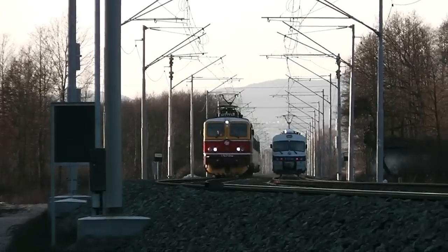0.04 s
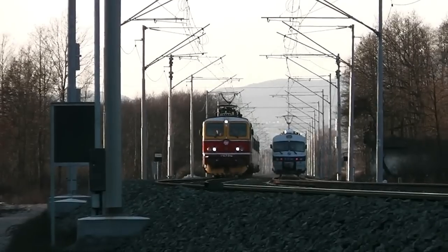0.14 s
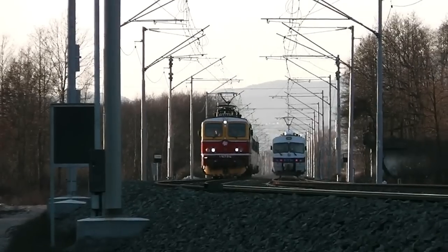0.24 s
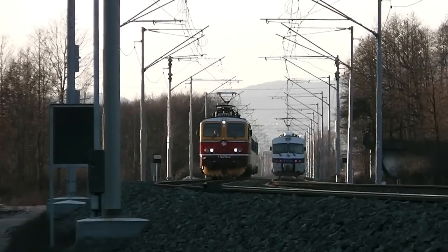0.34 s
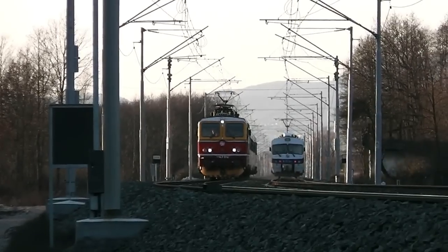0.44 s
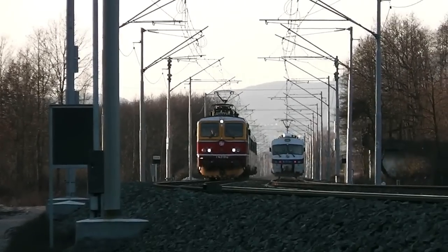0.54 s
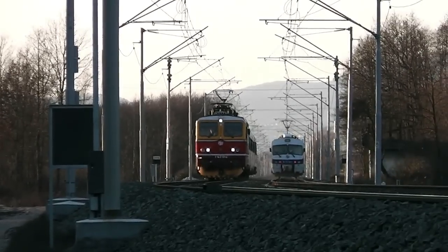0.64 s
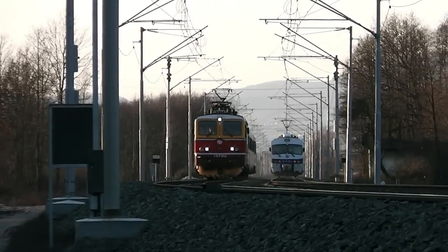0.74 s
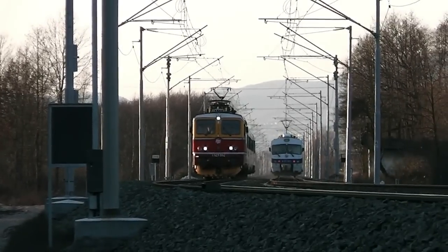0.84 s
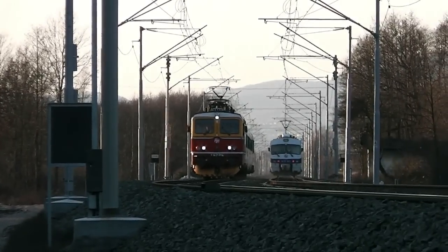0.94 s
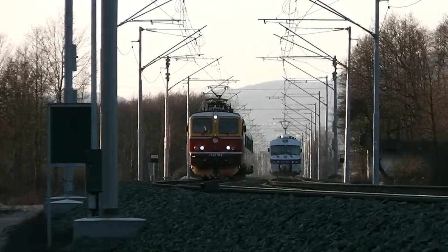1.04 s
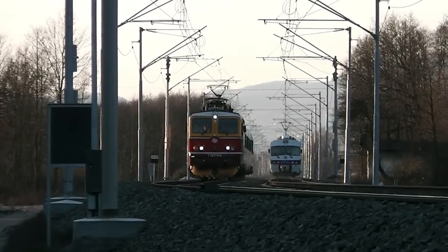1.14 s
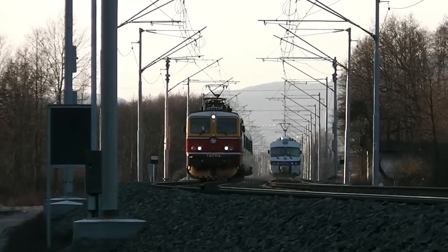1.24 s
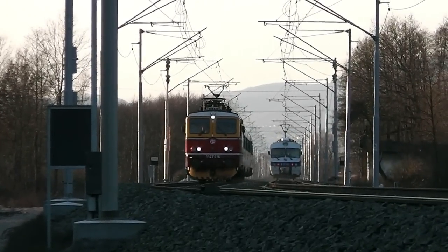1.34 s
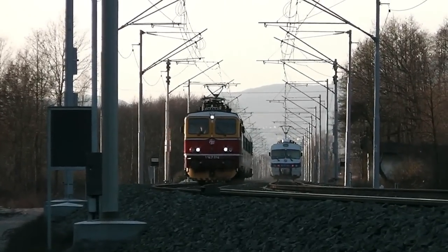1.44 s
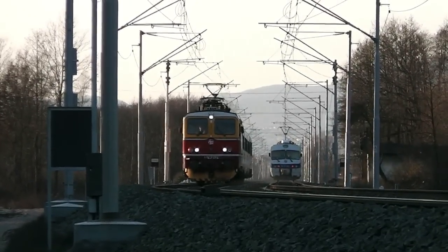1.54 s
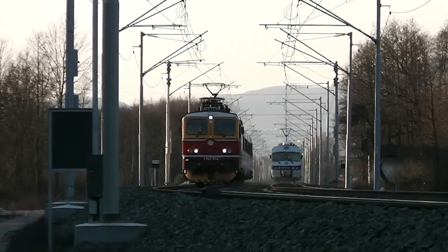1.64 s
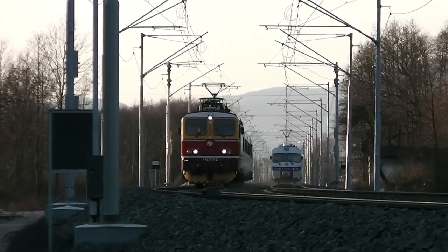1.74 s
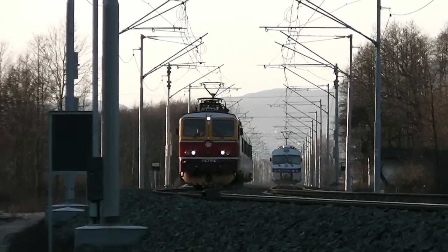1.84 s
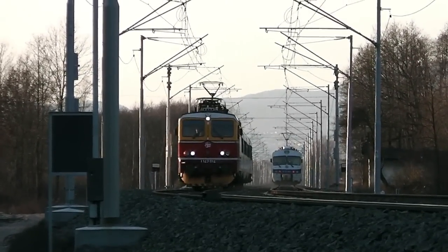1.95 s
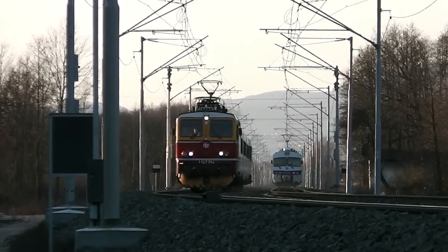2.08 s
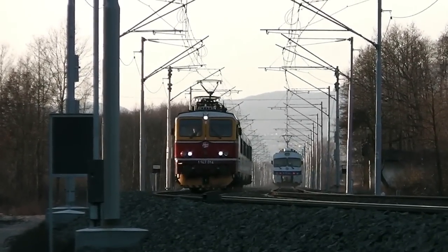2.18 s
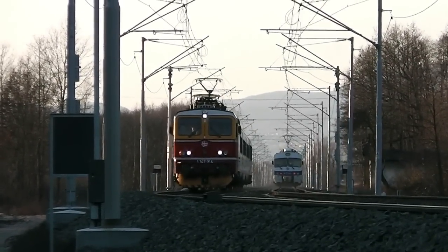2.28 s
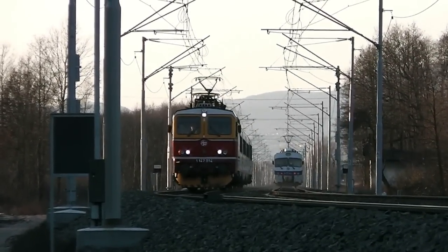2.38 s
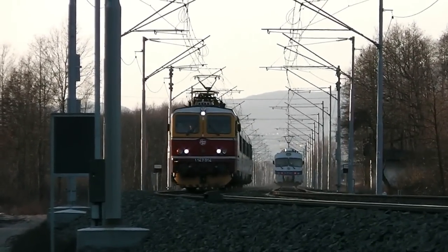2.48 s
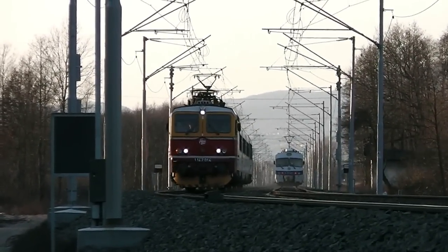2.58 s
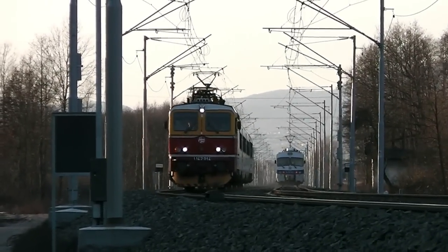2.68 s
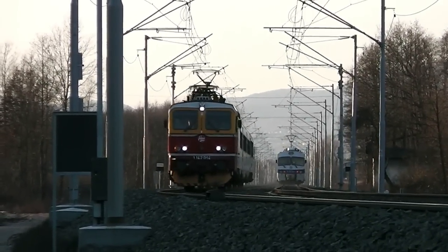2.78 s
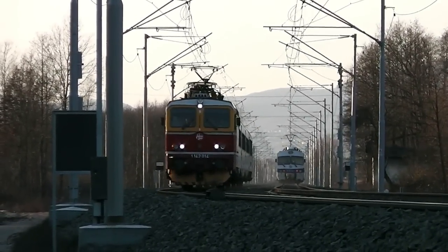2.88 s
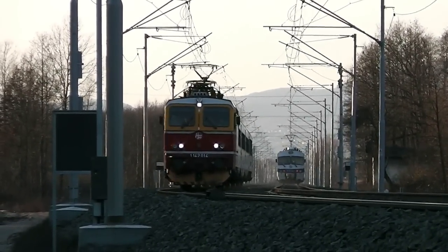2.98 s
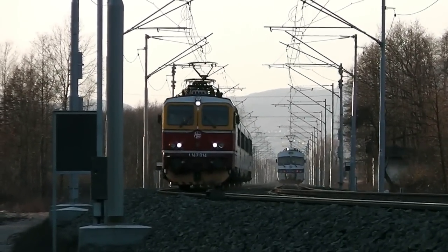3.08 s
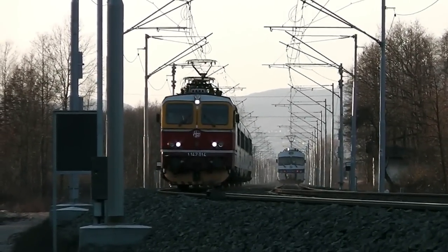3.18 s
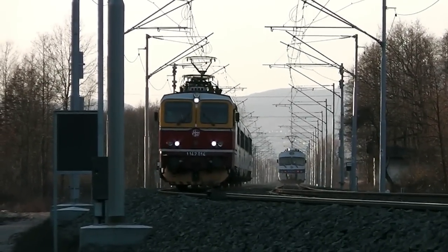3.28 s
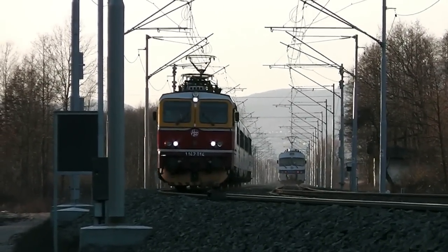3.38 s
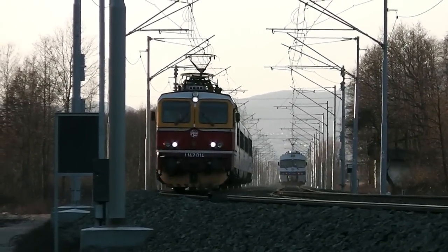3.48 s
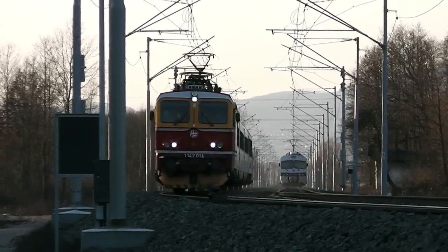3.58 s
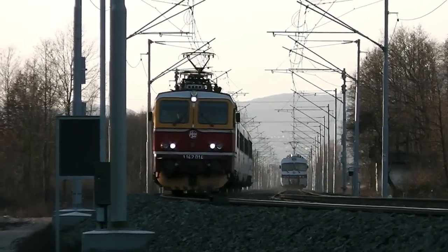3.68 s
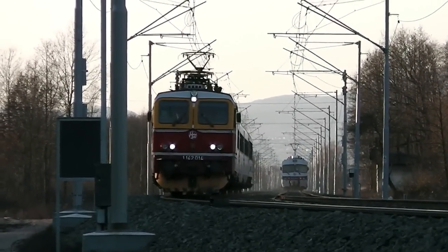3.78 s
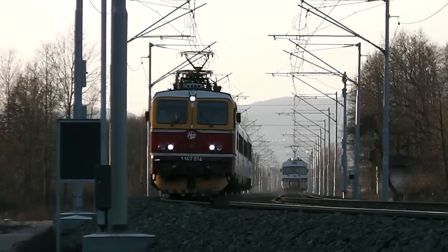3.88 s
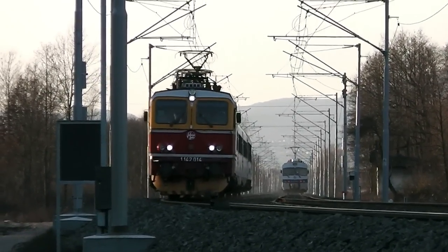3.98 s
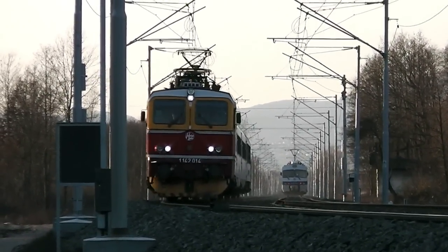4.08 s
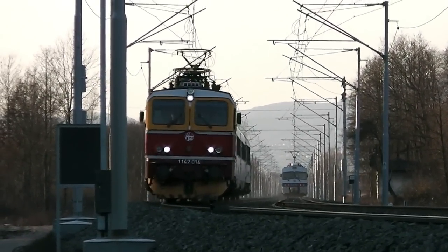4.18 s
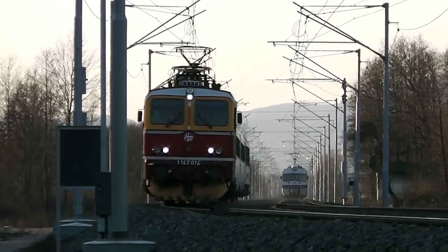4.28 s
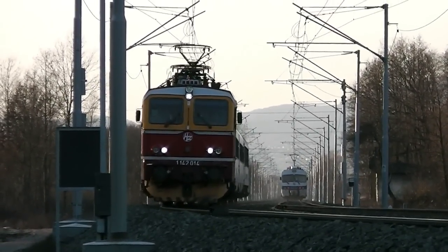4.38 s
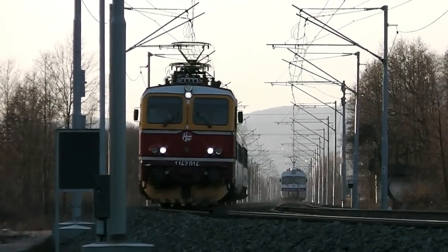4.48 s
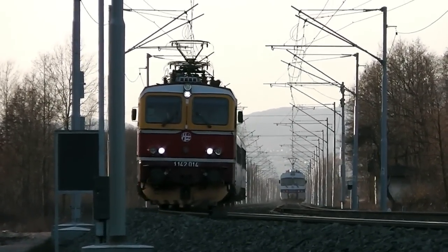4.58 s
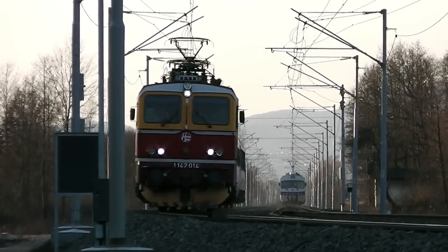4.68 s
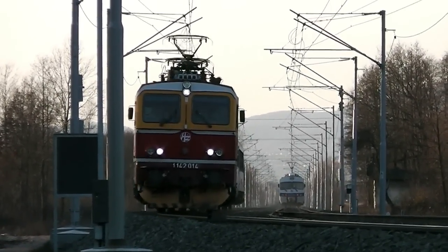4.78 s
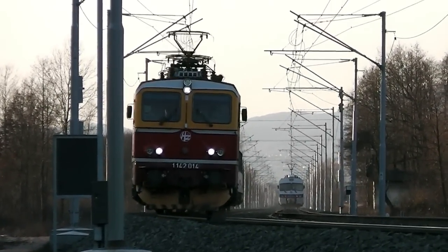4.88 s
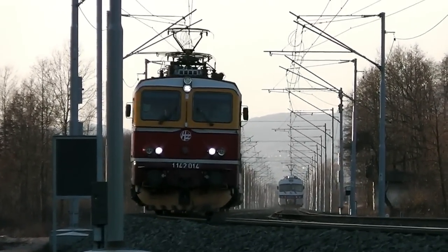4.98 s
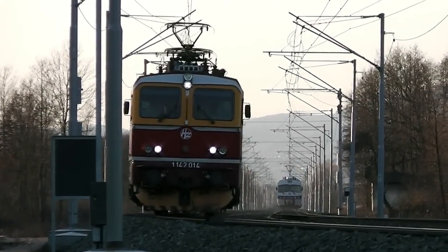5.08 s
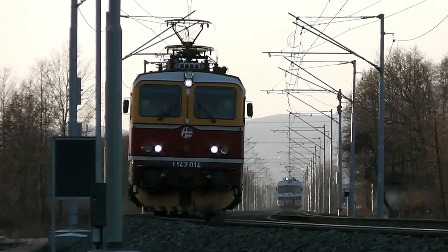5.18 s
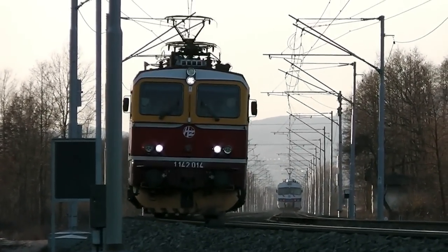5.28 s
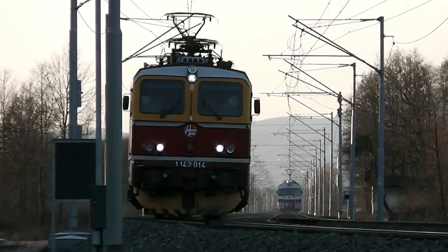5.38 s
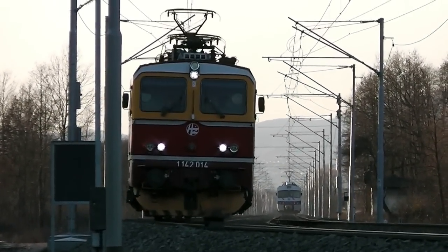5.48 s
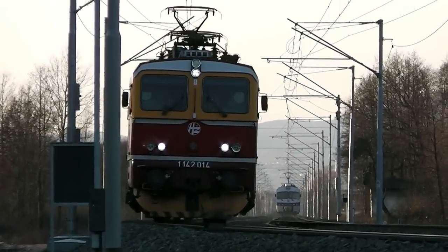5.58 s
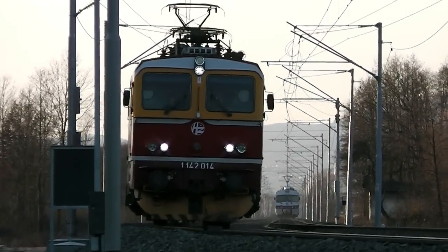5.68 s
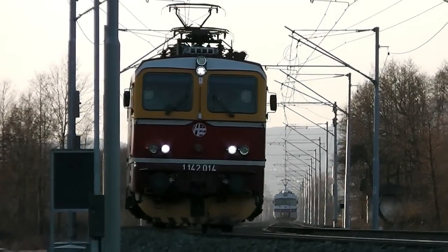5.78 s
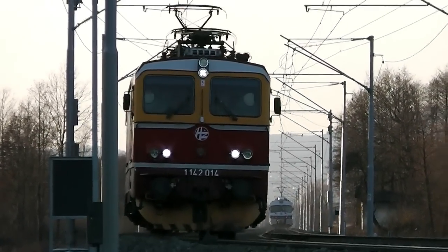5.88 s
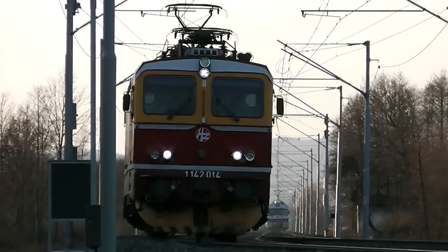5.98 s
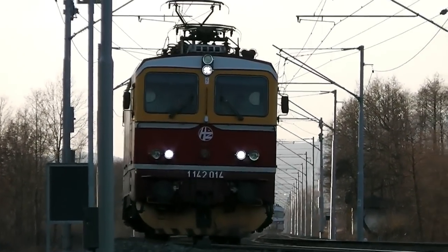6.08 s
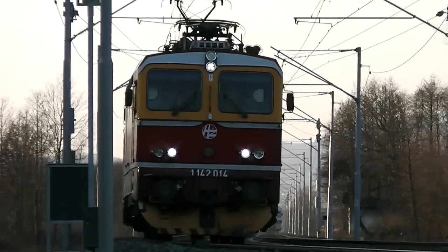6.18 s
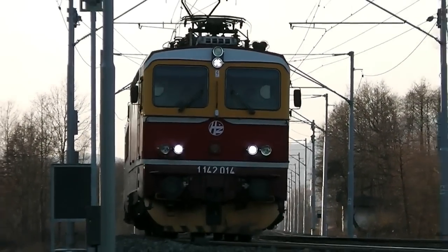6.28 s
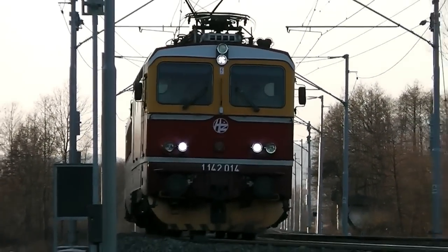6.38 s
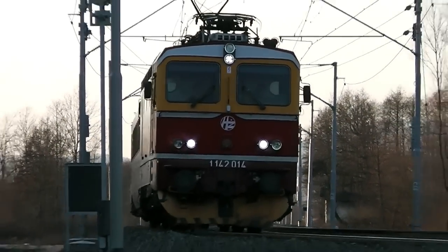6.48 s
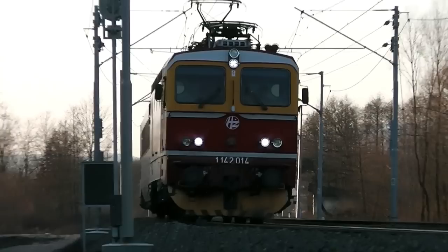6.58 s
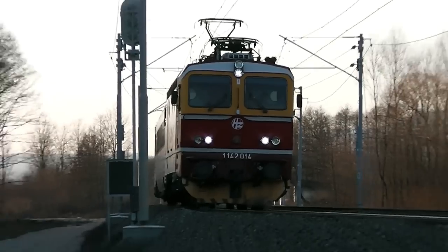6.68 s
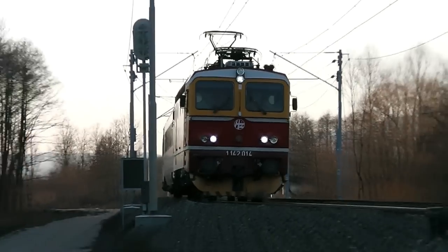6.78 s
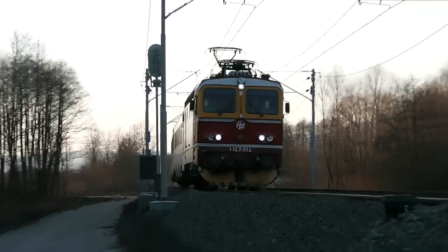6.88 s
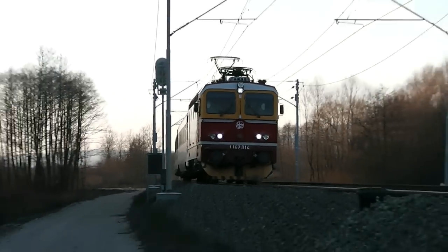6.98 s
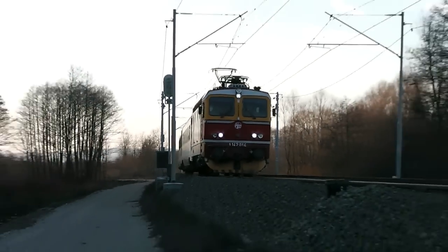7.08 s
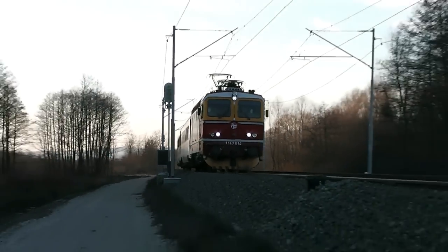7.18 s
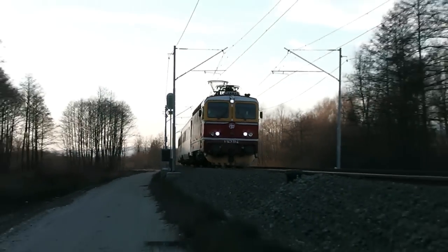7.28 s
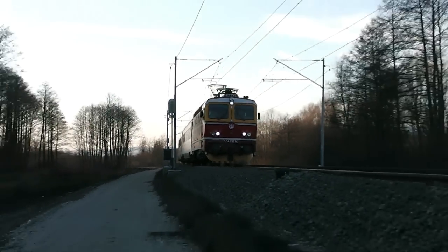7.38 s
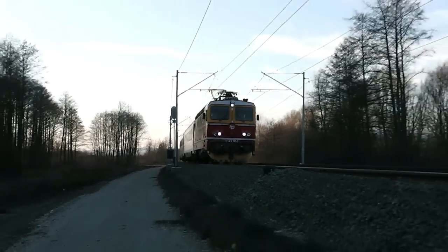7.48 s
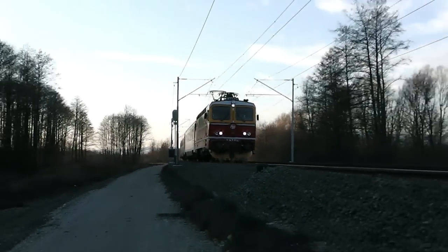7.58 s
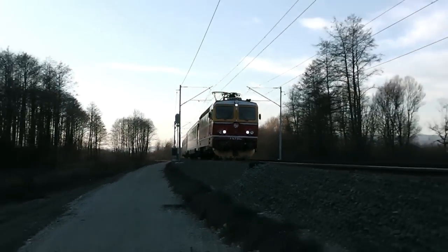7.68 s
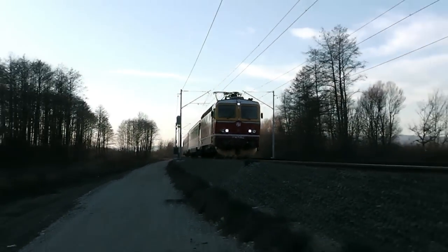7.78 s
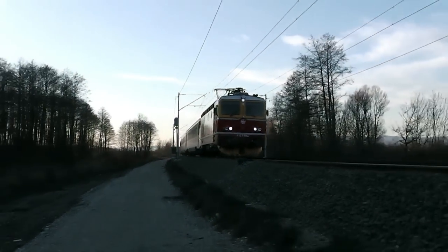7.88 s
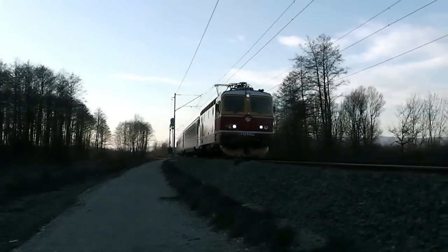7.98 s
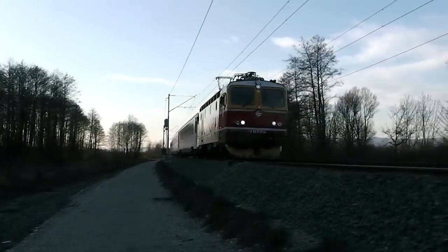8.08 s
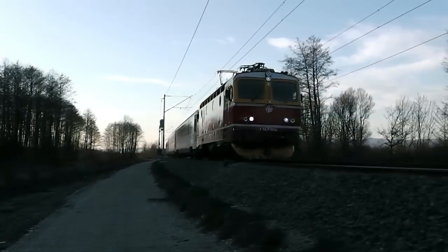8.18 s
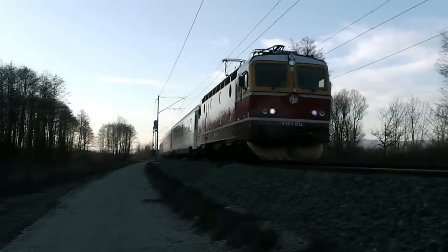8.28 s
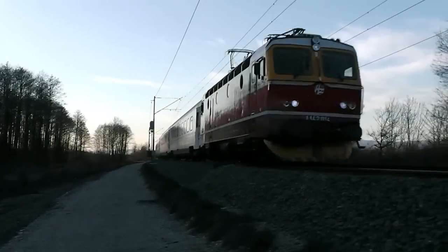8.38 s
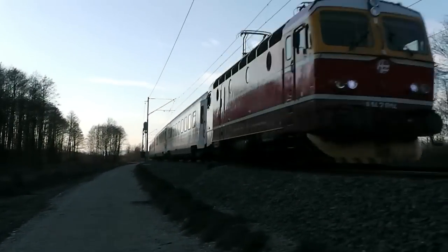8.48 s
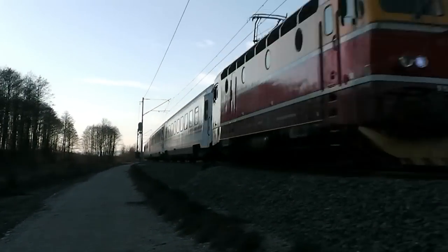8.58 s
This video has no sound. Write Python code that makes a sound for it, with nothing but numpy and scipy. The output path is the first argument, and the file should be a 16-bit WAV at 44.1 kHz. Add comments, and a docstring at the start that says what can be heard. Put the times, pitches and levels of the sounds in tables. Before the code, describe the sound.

An open-air trackside scene, heard in stereo from a few metres away. From 0 to 2 seconds it is quiet: low outdoor rumble, a hollow mid-pitched drone from a far train, and a barely audible hiss with tiny rapid ticks. Around 2 to 3 seconds thin, wavering high tones begin to sing in the rails. Rolling noise climbs steadily, a grainy metallic roar with ringing wheels clustered in the middle range, swelling a little near 4 seconds. From 5 to 7 seconds it grows fuller and a brighter hiss opens up; at about 7 a blower's hum swells briefly. From 7.5 the roar rises steeply, with deep ground rumble and body boom. After 7.9 short, quick surges pulse through it, strongest near 8.45. The ringing pitch sinks slightly. It ends near 8.6, at full force, with the locomotive almost alongside and no fading away.

```python
"""A low drone and rumble give way to a growing roar as an electric locomotive with coaches comes close.
Thin high tones run ahead inside the rails; a hiss opens up, and the locomotive's blower comes through last.
Wheel and rail roughness drives the ground, the sleepers, the rails and the ringing wheels.
Each of these is random noise shaped in frequency, then in level; the train is almost level at the end."""
import sys
import numpy as np
from scipy.fft import rfft, irfft, next_fast_len
from scipy.io import wavfile
from scipy.ndimage import uniform_filter1d, minimum_filter1d

SR = 44100
rng = np.random.default_rng(int(sys.argv[2]) if len(sys.argv) > 2 else 0)


def generate_wav(sig):
    """Save sig (samples, or channels by samples) to the path in sys.argv[1] as 16-bit PCM at SR."""
    pcm = np.round(np.clip(np.atleast_2d(sig).T, -1, 1) * 32767).astype(np.int16)
    wavfile.write(sys.argv[1], SR, pcm)


N = 381465
TIME = np.arange(N) / SR  # s
SIZE = next_fast_len(N + 4096, real=True)  # samples in each Fourier transform
HZ = np.maximum(np.arange(SIZE // 2 + 1) * SR / SIZE, 1)  # kept above 0 for the logarithm

ARRIVAL_S = 9.044  # when the locomotive would be level with the listener, after the end
SPEED_M_PER_S = 25
TRACK_M = 6.7  # from the listener to the track


def from_db(db):
    """Turns decibels into gain."""
    return 10 ** (np.asarray(db) / 20)


def in_time(rows):
    """Reads the columns of a time table at every sample."""
    s, *columns = np.transpose(rows)
    return [np.interp(TIME, s, column) for column in columns]


def over_hz(rows):
    """Reads the columns of a frequency table at every bin, along a logarithmic frequency axis."""
    hz, *columns = np.transpose(rows)
    return [np.interp(np.log(HZ), np.log(hz), column) for column in columns]


def colour(spectrum):
    """Gain per bin of a spectrum that falls away steeply above its last point."""
    last_hz = spectrum[-1][0]
    steep_fall = np.minimum(last_hz / HZ, 1) ** 4
    return from_db(over_hz(spectrum)[0]) * steep_fall


def resonances(modes):
    """Gain per bin of steep-sided resonances, added in power, with less treble far above the last."""
    power = 0
    for hz, width, db in modes:
        power = power + from_db(db) ** 2 / (1 + ((HZ - hz) / width) ** 2 * 2) ** 2
    last_hz = modes[-1][0]
    return np.sqrt(power) / (1 + (HZ / last_hz / 2) ** 4)


def excite(gain, low_hz=0, high_hz=SR):
    """Spectra of a direct and a scattered random drive through a response; rms 1 between the edges."""
    power = np.sum(gain[(HZ > low_hz) & (HZ < high_hz)] ** 2)
    white = rng.standard_normal((2, len(HZ), 2)).view(complex)[..., 0]
    return white * gain * SIZE / np.sqrt(power) / 2


def wave(spectra):
    """Turns spectra back into sound."""
    return irfft(spectra, SIZE)[..., :N]


def drift(rate):
    """A slow random wander: random points of spread 1, rate of them a second, joined by lines."""
    knots = rng.standard_normal(200)
    return np.interp(TIME * rate, np.arange(len(knots)), knots)


def swell_db(at_s, half_s, height_db):
    """A smooth rise and fall in level."""
    return height_db * np.exp(-((TIME - at_s) / half_s) ** 2)


def ahead_m():
    """Track still to cover before the locomotive is level with the listener."""
    return SPEED_M_PER_S * (ARRIVAL_S - TIME)


def closeness():
    """Inverse distance of the locomotive, 1 when it is level with the listener."""
    return TRACK_M / np.hypot(ahead_m(), TRACK_M)


def carried_db(level_db, loss_db_per_m, near_db, rough_share):
    """Rolling noise follows the roughness, loses the same dB on every metre and shifts close by."""
    # roughness of the stretch of rail under the train: t/s, level/dB
    roughness = [(0, .3), (1.4, -.3), (2.3, .2), (2.85, 1.0), (3.55, 0), (3.95, 1.0), (5.2, -.3), (6.5, .6),
                 (7.45, 2.3), (8.1, 1.5), (8.65, -1.2)]
    rough_db = rough_share * in_time(roughness)[0]
    return level_db + rough_db - loss_db_per_m * ahead_m() + near_db * closeness()


def doppler(sound):
    """Reads a sound at the changing pace of the approach, so that its pitch sinks."""
    # approach speed along the line of sight falls off: t/s, pitch factor
    pitch = [(0, 1.006), (3.5, 1.003), (7.0, .996), (8.65, .984)]
    place = np.cumsum(in_time(pitch)[0])
    return np.array([np.interp(place, np.arange(N), part, period=N) for part in sound])


def far_drone(level_db=-40.5):
    """The train's drone from far off: random noise gathered into a few resonances."""
    # modes carried along the line: f/Hz, width/Hz, level/dB
    far_modes = [(190, 36, -1.5), (613, 62, -4.5), (917, 45, 3), (990, 30, 4), (1338, 17, 8)]
    return from_db(level_db) * wave(excite(resonances(far_modes)))


def outdoor_rumble(level_db=-42.0):
    """A steady low outdoor rumble: random noise with most of its power in the bass."""
    # spectrum of the rumble: f/Hz, level/dB
    outdoors = [(10, -17), (25, -0.5), (45, -1.5), (63, 1.5), (85, -10.5), (130, -19), (400, -17.5),
                (2000, -58)]
    return from_db(level_db) * wave(excite(colour(outdoors)))


def rolling(uneven_db=0.7):
    """Roughness shakes ground, sleepers and rails; the many wheels ring in a cluster of close modes."""
    # spectra of the shaken ground, sleepers and rails: f/Hz, level/dB
    ground = [(15, -21), (30, -10), (52, 0), (85, -2), (112, 1), (135, -3), (165, .5), (195, -1),
              (228, 0.5), (280, -3.5), (350, -8), (600, -15), (1500, -61)]
    sleepers = [(200, -39), (350, -14.5), (430, -6.5), (510, -1.5), (640, 1), (720, -0.5), (790, -2),
                (900, -5), (1100, -11), (1500, -22), (2600, -49)]
    rails = [(500, -18.5), (800, -5.5), (950, 3), (1100, 4.5), (1350, 3), (1480, -0.5), (1620, .5),
             (1900, -.5), (2050, -7.5), (2200, -14), (2380, -18), (2560, -29.5), (3200, -30.5), (5000, -53)]
    # the ringing wheels: f/Hz, width/Hz, level/dB
    wheel_modes = [(1100, 25, -9), (1173, 50, -4.5), (1223, 41, -2), (1266.4, 33, 0.5), (1328, 26, -2),
                   (1358, 57, -5)]
    # how each part carries: level/dB, loss along the line/(dB/m),
    # change at close range/dB, weight of the roughness
    ground_carry = (-23.1, .115, .4, 1.2)
    sleeper_carry = (-15.9, .115, 5.8, .45)
    rail_carry = (-16.7, .096, -2.6, 1.9)
    wheel_carry = (-14.1, .101, -12.3, 1.05)
    # one swell of the sleepers' roar on the way: t/s, half length/s, level/dB
    roar_swell = (4.1, .42, 4.2)

    out = from_db(carried_db(*ground_carry)) * wave(excite(colour(ground)))
    sleeper_db = carried_db(*sleeper_carry) + swell_db(*roar_swell)
    out += from_db(sleeper_db) * wave(excite(colour(sleepers)))
    out += from_db(carried_db(*rail_carry)) * wave(excite(colour(rails)))
    ring = doppler(wave(excite(resonances(wheel_modes))))
    wheel_db = carried_db(*wheel_carry) + uneven_db * drift(9)
    return out + from_db(wheel_db) * ring


def faint_hiss_and_ticks(hiss_db=-66.6, tick_db=-66.0, tick_s=0.0027, period_s=0.04):
    """A faint steady hiss of white noise, and short bursts of high noise that tick at an even rate."""
    # pitch of the tick: f/Hz, width/Hz, level/dB
    tick_mode = [(5350, 670, 0)]
    pulses = np.exp(-((TIME % period_s - period_s / 2) / tick_s) ** 2)
    hiss = from_db(hiss_db) * rng.standard_normal((2, N))
    return hiss + from_db(tick_db) * pulses * wave(excite(resonances(tick_mode)))


def rail_song(waver_db=1.3):
    """Lightly damped rail modes carry narrow high tones far ahead of the train."""
    # level of the tones guided along the rails: t/s, level/dB
    singing = [(0, -78), (1.9, -77.5), (2.9, -67), (5.9, -65.5), (8.65, -68)]
    # high modes of the rails: f/Hz, width/Hz, level/dB
    rail_modes = [(2430, 35, -4), (5600, 120, -12), (7050, 250, -14), (7180, 130, -5.5), (7610, 130, -12),
                  (9585, 70, -8), (9630, 53, 3.5), (10900, 370, -18)]
    level_db = in_time(singing)[0] + waver_db * drift(8)
    return from_db(level_db) * wave(excite(resonances(rail_modes)))


def contact_hiss(air_db_per_s=3.05, air_power=1.45, near_s=0.45, far_s=5.7, flutter_db=0.7):
    """Air dulls the hiss of the contacts by the travel time left; far off, only nearby rail hisses."""
    # spectrum of the hiss: f/Hz, level/dB
    hiss = [(1500, -0.5), (2150, 7), (2600, -0.7), (3250, -5.0), (3900, 0), (4400, 1), (5100, -1.5),
            (6300, 0.5), (8700, 1.0), (10000, -2.3), (12000, -9.5), (15500, -15)]
    # how it carries: level/dB, loss/(dB/m), change at close range/dB, weight of the roughness
    hiss_carry = (-36.6, .156, 5.4, 1.8)
    level_db = carried_db(*hiss_carry) + flutter_db * drift(18)
    # the air path is held between none, near_s before arrival, and far_s of travel
    away_s = np.clip(ARRIVAL_S - near_s - TIME, 0, far_s)
    drive = excite(colour(hiss), 3300, 5500)
    centres = np.linspace(2000, 16000, 11)  # Hz, overlapping bands that add up to the whole
    out = np.zeros((2, N))
    for hz, share in zip(centres, np.eye(len(centres))):
        # the loss is relative to 4300 Hz
        loss_db = air_db_per_s * ((hz / 4300) ** air_power - 1) * away_s
        band = wave(drive * np.interp(HZ, centres, share))
        out += from_db(level_db - loss_db) * band
    return out


def locomotive(blower_db=-16.0, blower_falloff=1.1, boom_db=-22.0, boom_falloff=1.35):
    """The cooling blower hums and the heavy body booms; both grow as a power of closeness."""
    # the blower's tone, then the body's boom: f/Hz, width/Hz, level/dB
    blower_mode = [(689, 18, 0)]
    boom_mode = [(76, 30, 0)]
    # one swell of the blower's tone on the way: t/s, half length/s, level/dB
    blower_swell = (7.08, .28, 8.0)
    blower = from_db(blower_db + swell_db(*blower_swell)) * wave(excite(resonances(blower_mode)))
    boom = from_db(boom_db) * wave(excite(resonances(boom_mode)))
    return blower * closeness() ** blower_falloff + boom * closeness() ** boom_falloff


def microphone(sound):
    """Both ports hear the bass nearly alike; in the treble they part in level and phase."""
    # the two ports: f/Hz, left-right level/dB, left lead/rad, scattered against direct level/dB
    ports = [(100, -1, 0, -29), (550, -.6, 0, -22), (900, -.8, 0, -17.5), (1280, -2.3, 0, -15),
             (1900, 0, 0, -15), (2750, 0, 0, -21), (3700, 0, 0, -16.5), (6300, -.6, 0, -13.5),
             (9400, -5, -.65, -10.5), (10500, -8, -1.6, -1), (11300, -5, -3.1, -6), (12700, 1, -3.3, -9.5),
             (14200, 4.5, -4.2, -2.5), (15600, 1, -6.2, -8)]
    direct, scattered = rfft(sound, SIZE)
    balance_db, lead, scatter_db = over_hz(ports)
    ratio, scatter = from_db(balance_db), from_db(scatter_db)
    # scattered sound enters the two sides with opposite signs, which widens the image
    left = (direct + scatter * scattered) * ratio * np.exp(1j * lead)
    right = direct - scatter * scattered
    even_power = np.sqrt(2 / (1 + ratio ** 2) / (1 + scatter ** 2))
    return wave(np.array([left, right]) * even_power)


def scene():
    """The train over its own far drone, a low outdoor rumble and a faint ticking hiss."""
    # the roar surges briefly as the first wheels come close: t/s, level/dB
    surges = [(7.91, 1.5), (8.005, 1.7), (8.16, 1.2), (8.295, 2.2), (8.448, 3.6), (8.533, 1.6),
              (8.615, 2.4)]
    surge_db = sum(swell_db(s, 0.024, db) for s, db in surges)  # half length 0.024 s
    background = far_drone() + outdoor_rumble()
    train = rolling() + rail_song() + contact_hiss() + locomotive()
    return microphone(train * from_db(surge_db) + background) + faint_hiss_and_ticks()


def record(dry, release_db_per_s=52.0, ceiling=0.93, cutoff_hz=15780):
    """A limiter ducks briefly at the highest peaks; the top is cut."""
    over_db = np.maximum(20 * np.log10(np.abs(dry).max(axis=0) / ceiling + 1e-9), 0)
    # each duck starts at once and is let go at a steady rate
    release_db = release_db_per_s * TIME
    duck_db = np.maximum.accumulate(over_db + release_db) - release_db
    # widen and smooth the ducking over 32 samples
    smooth_db = uniform_filter1d(minimum_filter1d(-duck_db, size=32), size=32)
    limited = dry * from_db(smooth_db)
    top_cut = np.clip((cutoff_hz - HZ) / 80, 0, 1)  # fades to nothing over the last 80 Hz
    return wave(rfft(limited, SIZE) * top_cut)


dry = scene()
out = record(dry)
generate_wav(out)
```